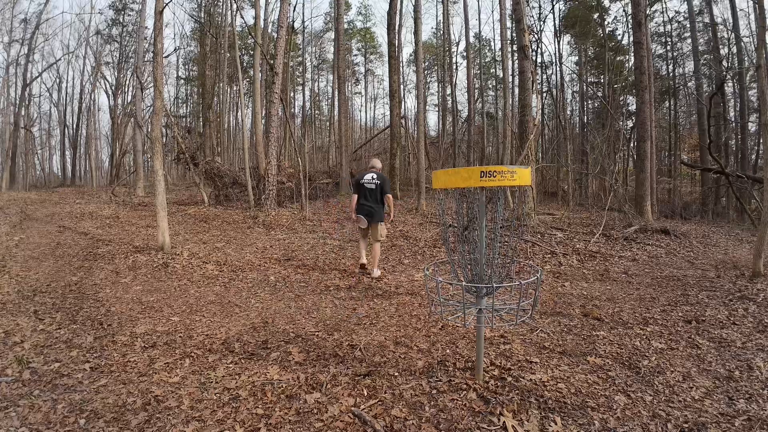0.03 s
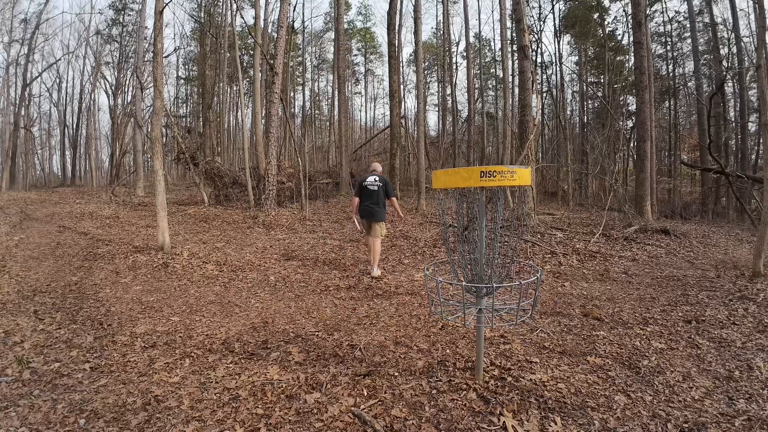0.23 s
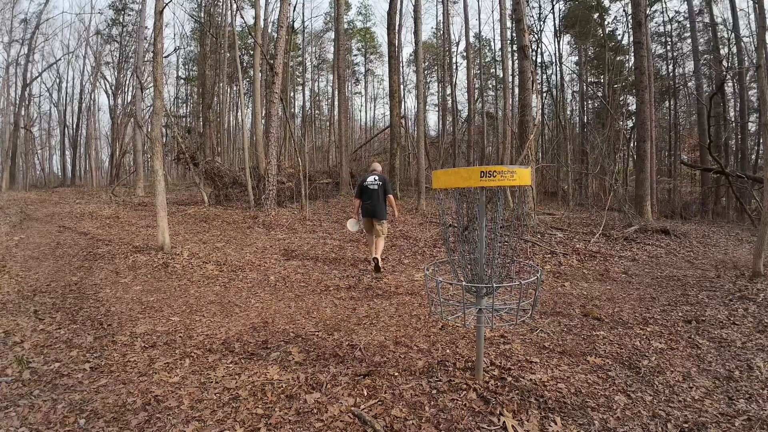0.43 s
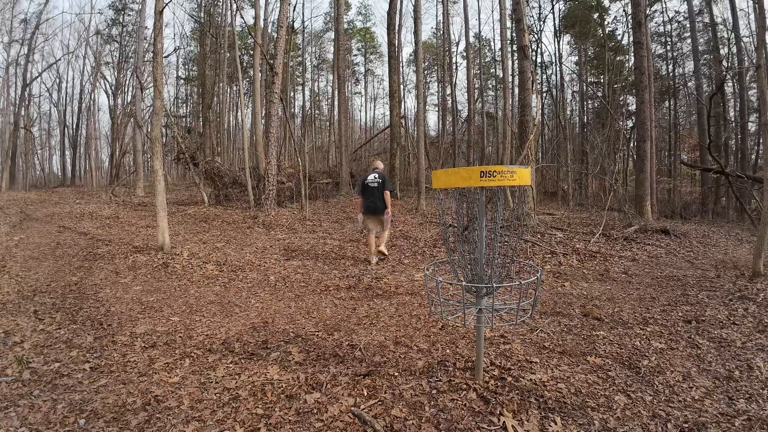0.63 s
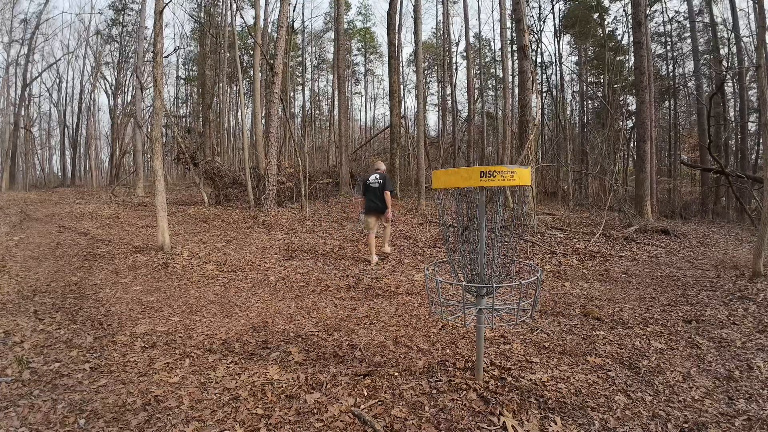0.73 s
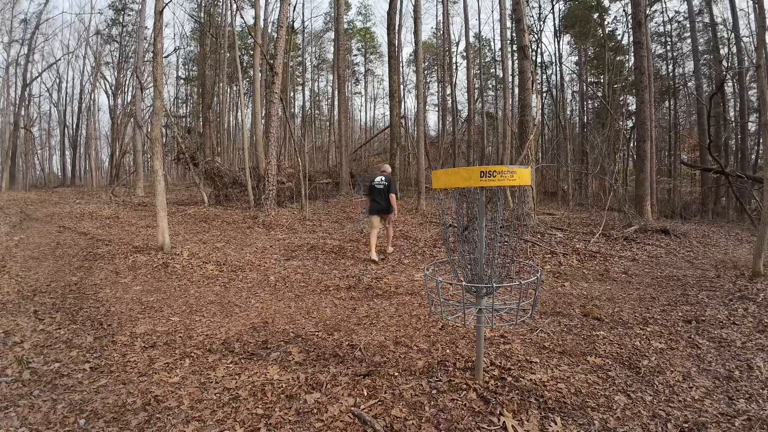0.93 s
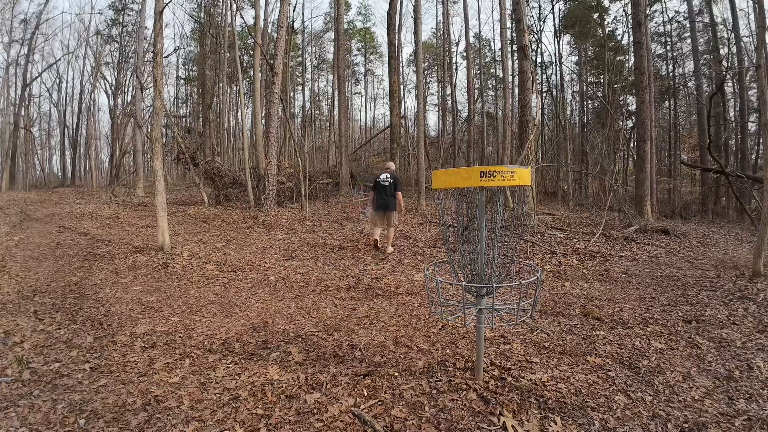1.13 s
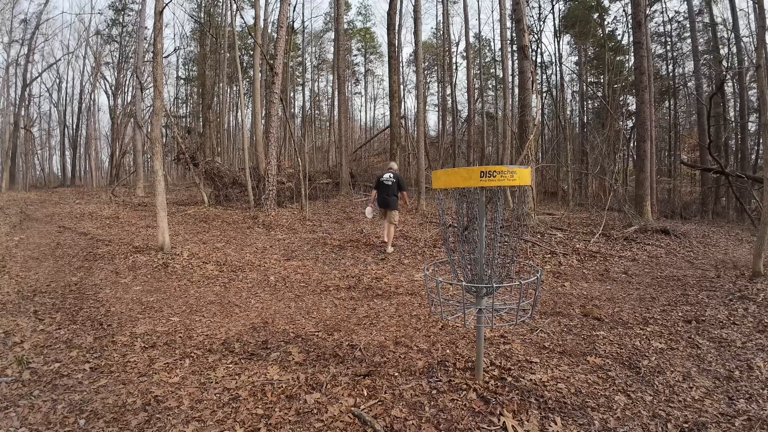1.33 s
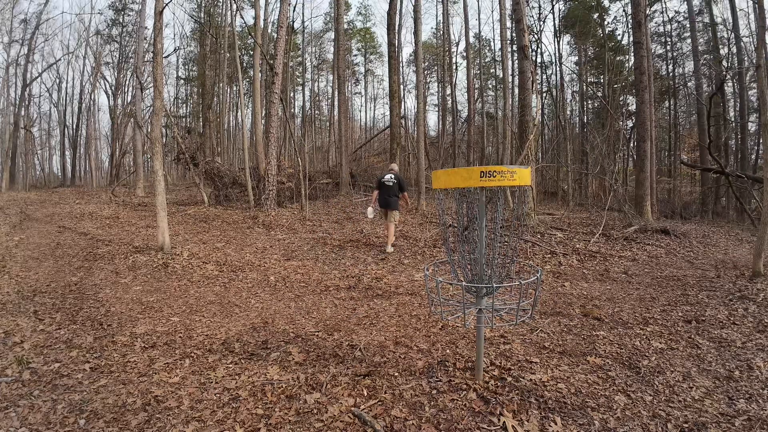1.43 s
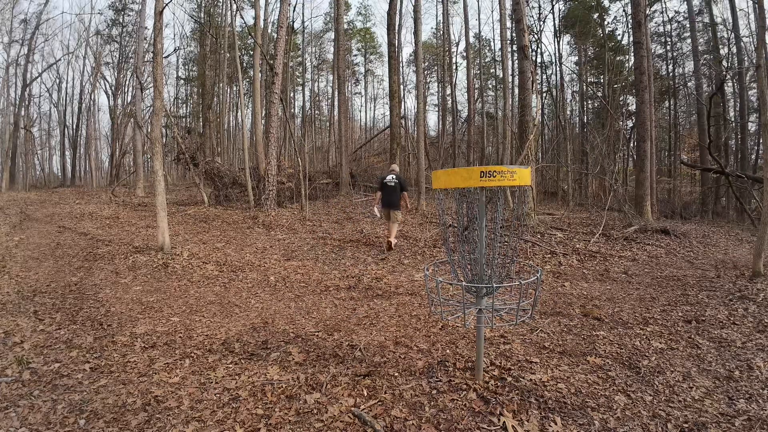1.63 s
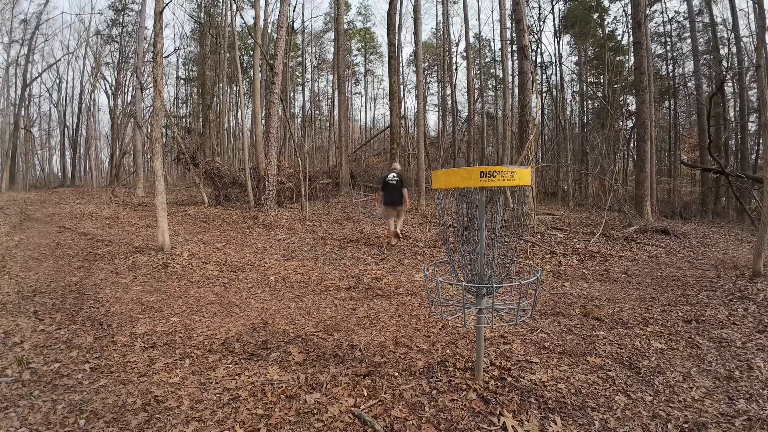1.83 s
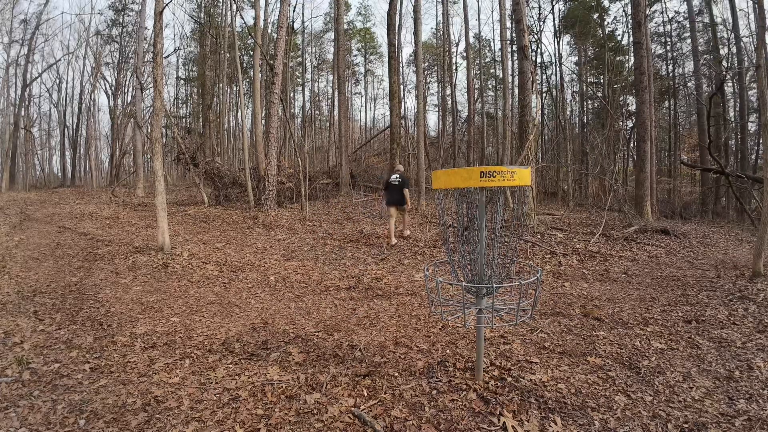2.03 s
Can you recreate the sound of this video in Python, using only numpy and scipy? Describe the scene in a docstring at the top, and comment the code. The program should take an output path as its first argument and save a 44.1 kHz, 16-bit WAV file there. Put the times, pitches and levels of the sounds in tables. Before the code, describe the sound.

Footsteps crunching through dry fallen leaves, small twigs snapping, low wind rumbling on the microphone

```python
"""Footfalls on dry leaves

Someone walks away over fallen leaves in a wood. Footfalls, brushed leaves and a soil scuff are sums of many tiny
damped rings over hiss; snapping twigs are noise cracks with decaying modes; a bird's thin, high whistle is
a wavering sine. Band-shaped noise makes the distant hush of the wood and the wind that buffets two microphone
ports. Scattered, faint echoes answer the walker."""
import sys
import numpy as np
from scipy import signal
from scipy.fft import rfft, irfft, next_fast_len
from scipy.io import wavfile
from scipy.ndimage import uniform_filter1d, map_coordinates

SR = 44100
rng = np.random.default_rng(int(sys.argv[2]) if len(sys.argv) > 2 else 0)


def output_pcm(signal):
    """Save a mono or channel-first signal as 16-bit PCM at the path in sys.argv[1].

    Samples are clipped to [-1, 1] before scaling.
    """
    pcm = np.clip(np.atleast_2d(signal).T, -1, 1) * 32767
    wavfile.write(sys.argv[1], SR, np.round(pcm).astype(np.int16))


N = 92301


def amp(db):
    """Logarithmic level: decibels to amplitude gain."""
    return 10 ** (np.asarray(db) / 20)


def unit(x):
    """Power normalisation: scale to rms 1."""
    return x / np.sqrt(np.mean(x ** 2) + 1e-20)


def clock():
    """Uniform sampling: the time of each sample in seconds."""
    return np.arange(N) / SR


def curves(rows):
    """Linear interpolation: one value per sample for each column after the time."""
    s, *cols = np.transpose(rows)
    return np.array([np.interp(clock(), s, c) for c in cols])


def wobble(rate):
    """Spline interpolation: a smooth random curve with rate knots a second."""
    knots = rng.standard_normal(4096)
    return map_coordinates(knots, [clock() * rate + 2], mode="wrap")


def swish(s, width, db):
    """Gaussian envelope: a gain that swells and fades around time s, with standard deviation width."""
    return amp(db) * np.exp(-.5 * ((clock() - s) / width) ** 2)


def filtered(x, response):
    """Linear filtering: multiply the spectrum of x by a zero-phase response of frequency."""
    m = next_fast_len(N + SR // 2)
    spectrum = rfft(x, m) * response(np.fft.rfftfreq(m, 1 / SR))
    return irfft(spectrum, m)[..., :N]


def coloured(x, points):
    """Spectral shaping: x through a (Hz, dB) curve on a logarithmic frequency axis, at rms 1."""
    f, db = np.transpose(points)
    return unit(filtered(x, lambda hz: amp(np.interp(np.log(hz + 1), np.log(f), db))))


def stereo(mid, side):
    """Sum and difference: left and right from mid and side."""
    return np.array([mid + side, mid - side])


def patchy(x, depth_db):
    """Short-lived resonance: random peaks a few hundred Hz wide that last tens of ms."""
    z = signal.stft(x, nperseg=512)[2]
    field = rng.standard_normal(z.shape[1:])
    field = uniform_filter1d(field, size=4, axis=0)  # over frequency
    field = uniform_filter1d(field, size=6, axis=1)  # over time
    return signal.istft(z * amp(depth_db * unit(field)), nperseg=512)[1][:, :N]


def crinkle(spectrum, rate, spread_db, hiss_db, centre_hz=6500, cycles=1.23, clump_db=2, patch_db=3.0,
            side_db=-22, count=20000, size=96):
    """Brittle fracture: damped rings of scattered size and pitch, rate a second, over clumped rubbing hiss."""
    when, strength, pitch, place = rng.random((count, 4))[:int(rate * N / SR)].T
    hz = np.clip(centre_hz * 2 ** (3 * (pitch - .5)), 500, 15000)  # 1.5 octaves either way
    turns = hz[:, None] * np.arange(size) / SR
    # a few strong fractures among many weak ones, capped at three spreads
    height = amp(-spread_db * np.log(np.maximum(strength, np.exp(-3))))
    rings = height[:, None] * np.sin(2 * np.pi * turns) * np.exp(-turns / cycles)
    at = ((when * N).astype(int)[:, None] + np.arange(size)).ravel()
    pair = []
    for weight in (1, place[:, None] - .5):  # mid, then side
        pair.append(unit(np.bincount(at, (rings * weight).ravel(), N + size)[:N]))
    pair = np.array(pair) + amp(hiss_db) * rng.standard_normal((2, N))
    clumped = patchy(pair, patch_db) * amp(clump_db * wobble(130))
    mid, side = coloured(clumped, spectrum)
    return stereo(mid, amp(side_db) * side)


CONTACT_DB, SWELL = -12.5, 2.12  # first touch relative to full weight; curvature of the rise
TOUCH_S = 0.013  # time for the sole to meet the leaves


def load(start, rise, db, release):
    """Dynamic loading: sudden touch, swell to full weight, then release at a steady dB rate."""
    t = clock() - start
    swell_db = CONTACT_DB * np.clip(1 - t / rise, 0, 1) ** SWELL
    release_db = release * np.maximum(t - rise, 0)
    return np.clip(t / TOUCH_S, 0, 1) * amp(db + swell_db - release_db)


# Footfalls. Each row: first contact in seconds, time to full weight in seconds, level in dB,
# release in dB per second.
STEPS = [(0.265, 0.098, -44, 114), (0.9, 0.064, -43.5, 111), (1.49, 0.09, -46, 147),
         (2.073, 0.052, -50, 120)]
CRUSH_DB, CRUSH_RELEASE_DB_PER_S = -8.5, 212  # packed layer: level relative to the step, and its release
# A shoe scraping the soil: centre in seconds, standard deviation in seconds, level in dB.
SCUFF = (.867, .009, -60)
# Spectra of the top leaves, packed layer and soil. Each row: frequency in Hz, relative density in dB.
LEAVES = [(200, -1), (600, -9.5), (1700, -2.5), (2400, -7), (4000, 0), (5200, 1), (7000, -2), (15000, 3.5)]
PACKED = [(150, -30), (400, 0), (700, -6.5), (1250, 5.5), (1700, -12), (2400, 9.5), (4500, 2.5), (8000, 11),
          (15000, -6)]
SOIL = [(200, -24), (450, -4), (750, 0.5), (1200, -10), (2400, -1), (5000, -17), (15000, -32)]


def footfalls():
    """Crushing under load: bright top leaves, a faster-fading crunch of the packed layer, one soil scuff."""
    top = sum(load(*step) for step in STEPS)
    deep = sum(load(s, rise, db + CRUSH_DB, CRUSH_RELEASE_DB_PER_S) for s, rise, db, _ in STEPS)
    crackle = crinkle(LEAVES, rate=3000, spread_db=2, hiss_db=0, side_db=-64)
    crunch = crinkle(PACKED, rate=2200, spread_db=1.5, hiss_db=-0.5, centre_hz=2650, cycles=0.87, side_db=-55)
    scrape = crinkle(SOIL, rate=2000, spread_db=2, hiss_db=4, centre_hz=1500, cycles=0.42, side_db=-29)
    return top * crackle + deep * crunch + swish(*SCUFF) * scrape


# Feet brushing through loose leaves. Each row: centre in seconds, standard deviation in seconds,
# level in dB before the tilt, brightness (treble relative to low part) in dB.
BRUSHES = [(0.084, 0.024, -64, -2.5), (0.495, 0.022, -51.5, -9), (0.651, 0.03, -59.5, -7),
           (0.854, 0.041, -61.5, 4), (1.053, 0.015, -47.5, -4), (1.138, 0.031, -49, -5.5),
           (1.474, .025, -63.5, 2), (1.698, 0.021, -62, -7), (1.752, 0.012, -57, 17.5)]
# Disturbed leaves settling between the steps. Each row: time in seconds, level in dB.
SETTLING = [(0, -71.5), (.17, -75.5), (.3, -59), (.6, -65), (.78, -65.5), (1.15, -64), (1.34, -82),
            (1.65, -72), (1.88, -81.5), (2.05, -68)]
# Spectrum of loose leaves. Each row: frequency in Hz, relative density in dB.
LOOSE = [(300, -34), (900, -14), (2200, -11.5), (3600, -1.5), (6000, 0.5), (15000, 6.5)]


def loose_leaves():
    """Friction and settling: brushed leaves rustle, the driest brightest, and sparser ticks follow a curve."""
    settle_db, = curves(SETTLING)
    rustle = crinkle(LOOSE, rate=2200, spread_db=4, hiss_db=-2.5, side_db=-38)
    low = filtered(rustle, lambda hz: 1 / (1 + (hz / 6000) ** 4))
    high = rustle - low
    brushed = 0
    for s, width, db, bright in BRUSHES:
        tilted = amp(-bright / 2) * low + amp(bright / 2) * high
        brushed = brushed + swish(s, width, db) * tilted
    ticks = crinkle(LOOSE, rate=470, spread_db=4, hiss_db=0, centre_hz=8730, side_db=-27)
    return brushed + amp(settle_db) * ticks


# Twigs breaking. Each row: start in seconds, gain in dB, woody knock relative to the crack in dB,
# ratio that multiplies the mode frequencies.
SNAPS = [(0.3565, -18.5, -1.5, 1.06), (0.3793, -32.5, 2, 1.35), (0.6374, -30, -7.5, 5),
         (0.662, -44, -20, 3.8), (.815, -44.5, -4, 3.17), (0.9, -40.5, -18, 4.5), (.946, -39, -7, 3.7),
         (1.056, -39, -3.5, 5.2), (1.588, -41.5, 1.5, 1.9), (1.753, -39, -29, 5), (1.969, -49.5, -7, 3.23)]
# Modes of a twig. Each row: frequency in Hz at ratio 1, level in dB, time to fall 60 dB in seconds.
TWIG = [(540, -9.5, .009), (717, 2, 0.0078), (990, 0.5, 0.0077), (1350, -4.5, 0.012), (2500, -0.5, 0.0054)]
CRACK_T60_S, SNAP_ATTACK_S = 0.0075, 0.00075  # time to fall 60 dB; time constant of the onset


def twigs():
    """Modal decay: each break is a short noise crack with a dead, woody knock; thinner twigs knock higher."""
    out, t = np.zeros(N + SR), np.arange(SR // 20) / SR
    onset = 1 - np.exp(-t / SNAP_ATTACK_S)
    for s, db, knock_db, ratio in SNAPS:
        knock = sum(amp(level - 60 * t / t60) * np.sin(2 * np.pi * ratio * hz * t) for hz, level, t60 in TWIG)
        crack = amp(-60 * t / CRACK_T60_S) * rng.standard_normal(len(t))
        out[round(s * SR):][:len(t)] += amp(db) * onset * (crack + amp(knock_db) * knock)
    return out[:N]


def trunks(x, wet_db=-17, t60=0.26, reach_s=.12, count=24):
    """Scattering: faint answers from the tree trunks, as sparse delayed copies of random sign."""
    delay, sign = rng.random((count, 2)).T
    delay = .008 + reach_s * delay
    taps = np.bincount((delay * SR).astype(int), np.sign(sign - .5) * amp(-60 * delay / t60))
    taps = taps[None] / np.linalg.norm(taps)
    return amp(wet_db) * signal.fftconvolve(x, taps, axes=1)[:, :N]


# Bird whistle. Each row: time in seconds, central pitch in Hz, central level in dB.
BIRD = [(0, 8150, -69), (.04, 8170, -67), (.095, 7980, -67), (.115, 8000, -79), (.17, 8000, -84),
        (.24, 7880, -78), (.3, 7850, -95)]
BIRD_LEAD_RAD = 1.94  # phase between the ports: the bird sits off to one side


def bird():
    """Frequency modulation: a thin, wavering sine whistle that sags and fades."""
    hz, db = curves(BIRD)
    phase = 2 * np.pi * np.cumsum(hz + 75 * wobble(350)) / SR
    gain = amp(db + 3 * wobble(80)) * (clock() < BIRD[-1][0])  # silent after the last row
    return gain * np.sin(phase + BIRD_LEAD_RAD * np.array([[.5], [-.5]]))


def turbulence(spectrum, size=1500):
    """Turbulent pressure: low noise, unrelated at the two ports, its short-term power held near 1."""
    x = coloured(rng.standard_normal((2, N)), spectrum)
    power = uniform_filter1d(uniform_filter1d(x ** 2, size), size // 2)
    return x / np.sqrt(np.abs(power) + 0.00057)


# Base wind at the ports, rising and falling. Each row: time in seconds, left level in dB, right level in dB.
WIND = [(0, -48, -44), (.06, -48, -31.5), (.2, -47.5, -36), (.47, -42, -36.5), (.8, -45, -35),
        (1.05, -45.5, -35.5), (1.18, -54, -33), (1.3, -42, -45.5), (1.6, -50, -47.5), (1.9, -49, -50),
        (2.0, -44, -38)]
# Eddies striking the ports. Each row: centre in seconds, standard deviation in seconds,
# left level in dB, right level in dB.
BUFFETS = [(0.178, 0.026, -45, -35.5), (0.328, 0.021, -38.5, -30.5), (0.358, 0.017, -32, -36),
           (0.601, 0.01, -22, -66), (0.709, 0.035, -31.5, -28.5), (0.87, 0.0096, -63, -30.5),
           (0.976, 0.012, -33.5, -23.5), (1.097, 0.011, -28.5, -32.5), (1.149, 0.025, -30, -30.5),
           (1.256, 0.02, -30.5, -53), (1.36, 0.0089, -36, -57), (1.461, 0.0072, -34.5, -45),
           (2.072, 0.013, -58, -25.5)]
# Spectra of the shifting base draught and the eddies. Each row: frequency in Hz, relative density in dB.
DRAUGHT = [(12, -9.5), (25, 3.5), (60, 6), (85, -0.5), (125, -12.5), (200, -43), (400, -38.5), (900, -100)]
EDDY = [(15, -7), (40, -1), (80, 7.5), (115, -2), (160, -11.5), (230, -27), (380, -45), (900, -72)]


def wind():
    """Flow noise: a deep, shifting draught on both ports, with brief eddies that thump on one or both."""
    thumps = [sum(swish(s, width, dbs[port]) for s, width, *dbs in BUFFETS) for port in range(2)]
    return amp(curves(WIND)) * turbulence(DRAUGHT) + np.array(thumps) * turbulence(EDDY)


# Spectrum of the distant wood. Each row: frequency in Hz, relative density in dB.
FOREST = [(100, 6.5), (200, 8), (330, -2), (600, -1), (900, 0), (1400, -6.5), (2000, -12), (4000, -16),
          (8000, -26.5), (15000, -20.5)]
# Stereo width of the wood. Each row: frequency in Hz, side relative to mid in dB.
FOREST_WIDTH = [(300, -6.5), (900, -10), (2000, -9.5), (5000, -5.5), (8000, -6), (14000, -4)]
FOREST_DB = -65.5  # level of the hush before the side is narrowed


def forest():
    """Diffuse field: the steady, distant hush of the wood as independent mid and side noise."""
    mid, side = coloured(patchy(rng.standard_normal((2, N)), depth_db=1.5), FOREST)
    f, db = np.transpose(FOREST_WIDTH)
    side = filtered(side, lambda hz: amp(np.interp(hz, f, db)))
    return amp(FOREST_DB) * stereo(mid, side)


def scene():
    """Superposition: the walker ahead with echoes, the bird, the wood around, wind at the microphone."""
    walker = footfalls() + loose_leaves() + twigs()
    return walker + trunks(walker) + bird() + forest() + wind()


# Microphone colour. Each row: frequency in Hz, gain in dB.
MIC = [(6000, -0.5), (7200, -1.5), (8000, 2), (8700, -2), (10100, 2.5), (11300, -1.5), (12500, -6),
       (12950, 6.5), (13500, 4.5), (14300, 1.5), (15100, -6.5), (15700, -24)]
TOP_HZ = 15750  # band limit


def record(dry):
    """Frequency response: the microphone colours the top treble and keeps nothing above the band limit."""
    f, db = np.transpose(MIC)
    return filtered(dry, lambda hz: amp(np.interp(hz, f, db)) * (hz < TOP_HZ))


dry = scene()
out = record(dry)
output_pcm(out)
```